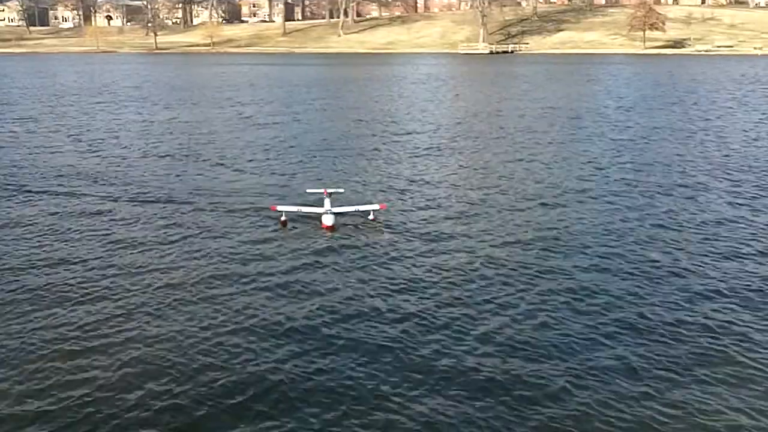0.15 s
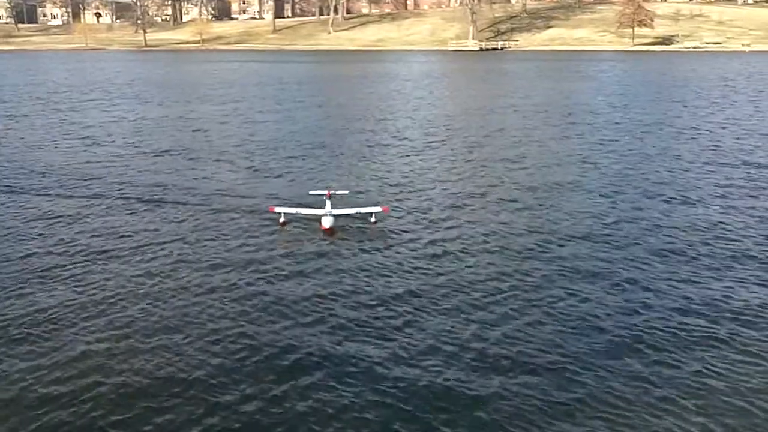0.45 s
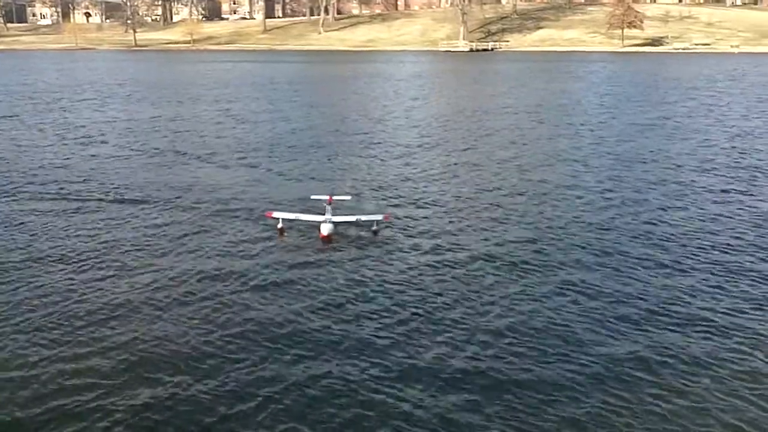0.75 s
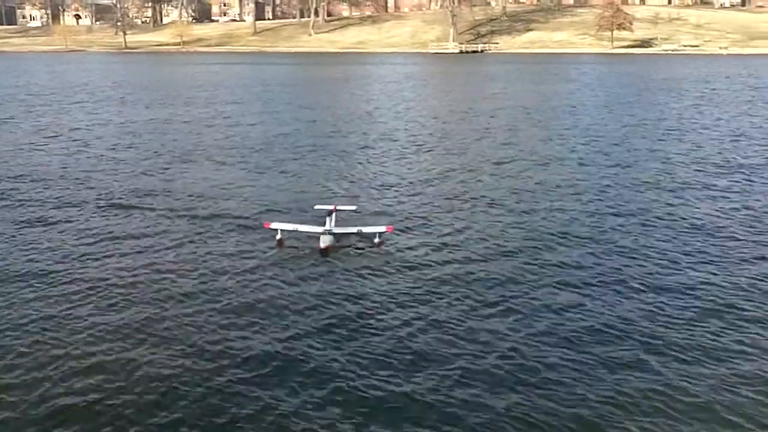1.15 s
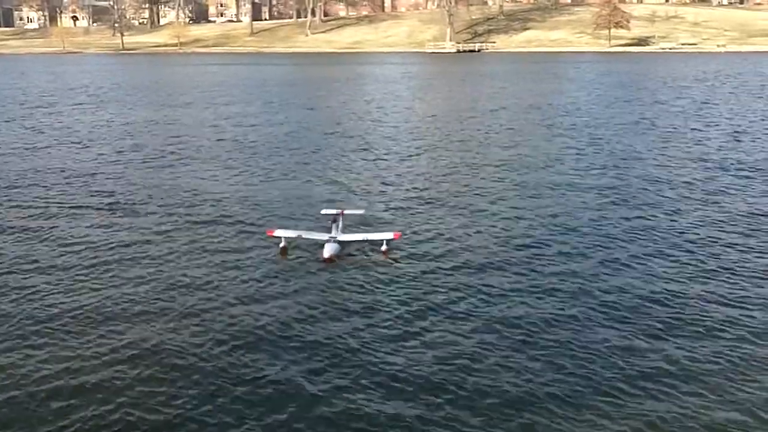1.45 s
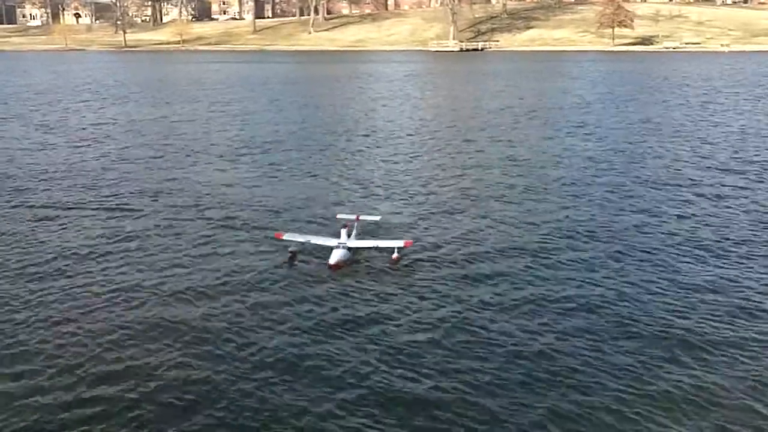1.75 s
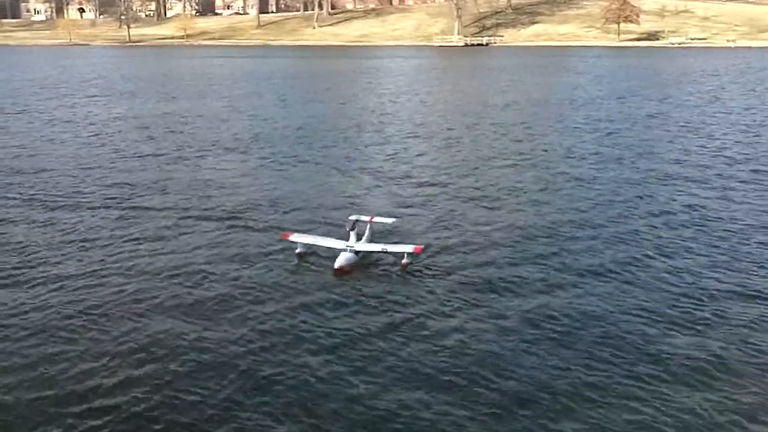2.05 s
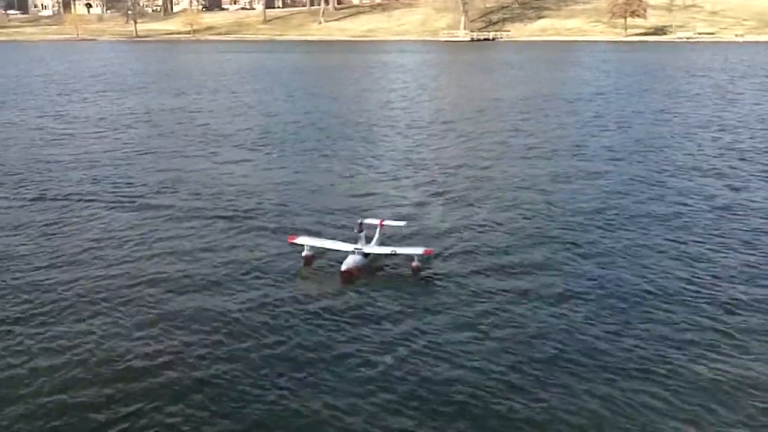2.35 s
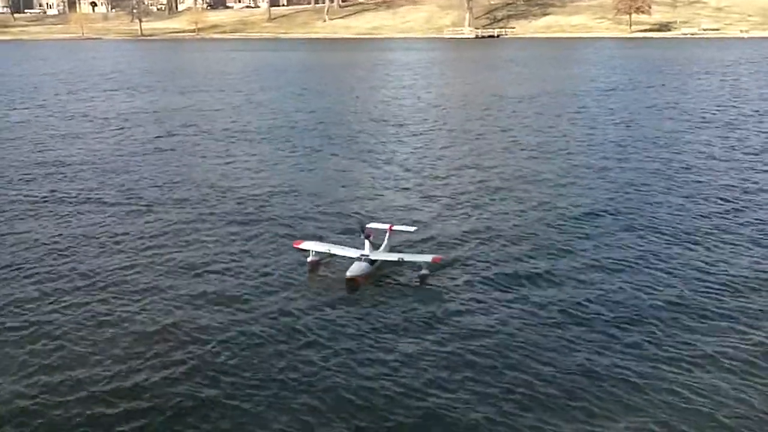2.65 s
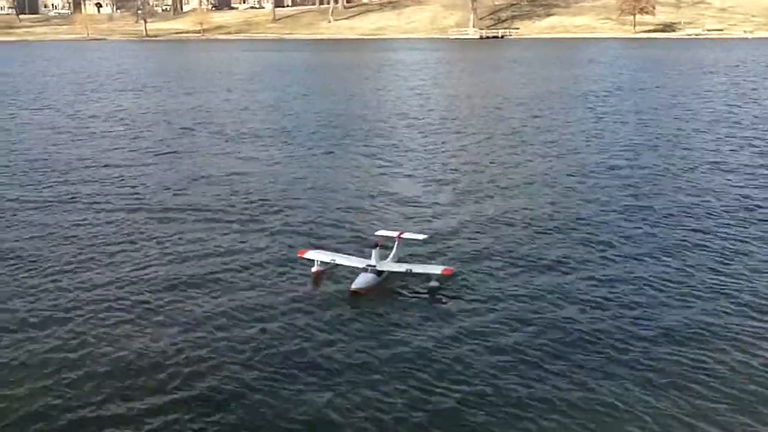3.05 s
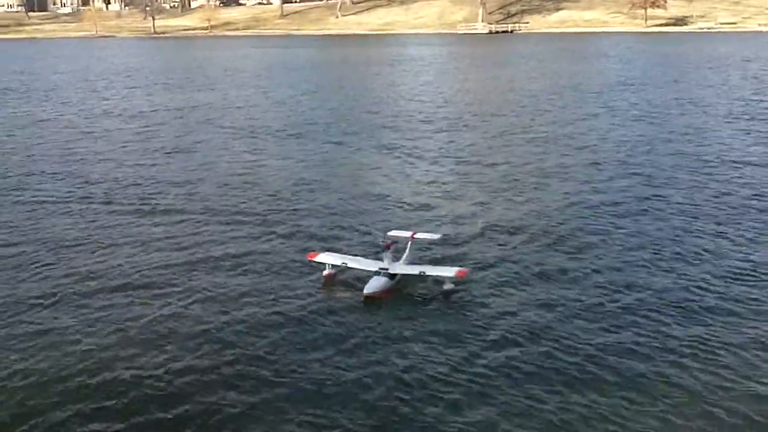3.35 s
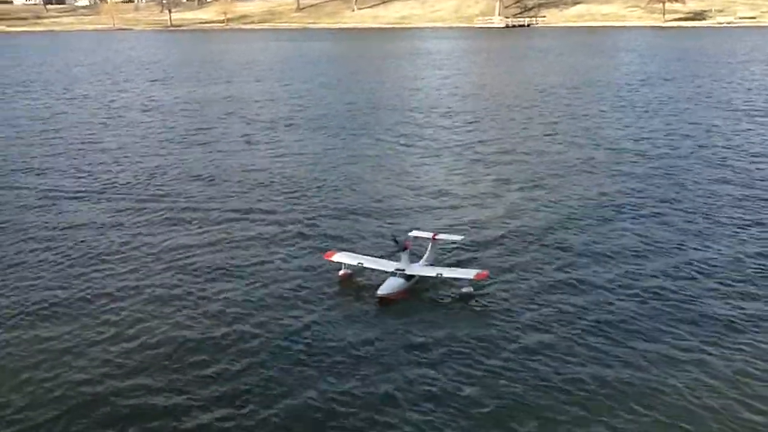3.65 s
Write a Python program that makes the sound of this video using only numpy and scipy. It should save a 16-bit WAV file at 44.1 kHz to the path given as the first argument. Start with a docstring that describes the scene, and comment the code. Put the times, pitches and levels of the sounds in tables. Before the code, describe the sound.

A small electric model seaplane taxis on a lake with a thin, high whine and propeller hiss, easing off twice. Wind rumbles and thumps on the microphone throughout, over a soft wash of water and faint drips.

```python
"""Electric seaplane taxiing on a lake

A small electric seaplane taxis and throttles back twice. Its speed controller whines at a near-fixed
pitch, with side tones spaced by the shaft speed; the motor casing rings and the propeller hisses.
Water drips and ticks over a far wash, and wind buffets the microphone. The sound is nearly mono."""
import sys
import numpy as np
from scipy import signal
from scipy.fft import rfft, irfft
from scipy.io import wavfile

SR = 44100
rng = np.random.default_rng(int(sys.argv[2]) if len(sys.argv) > 2 else 0)


def unload_audio(sound):
    """Save the sound as a 16-bit wav file, at the path given as the first command line argument."""
    columns = np.transpose(np.atleast_2d(sound))
    # keep every value between -1 and 1, then stretch to whole-number steps
    steps = np.round(np.clip(columns, -1, 1) * 32767)
    wavfile.write(sys.argv[1], SR, steps.astype(np.int16))


N = 168021
TIME = np.arange(N) / SR


def amp(db):
    return 10 ** (np.asarray(db) / 20)


def unit_rms(x):
    return x / np.sqrt(np.mean(x ** 2) + 1e-20)


def curves(rows):
    times, *columns = np.transpose(rows)
    return [np.interp(TIME, times, column) for column in columns]


def phase_of(hz):
    return 2 * np.pi * np.cumsum(hz) / SR


def band(x, low_hz, high_hz, order=2):
    return signal.sosfilt(signal.butter(order, [low_hz, high_hz], "band", fs=SR, output="sos"), x)


def coloured(spectrum):
    """Noise of a given spectrum, falling 40 dB in the octave beyond each end; rms 1."""
    hz, db = np.transpose(spectrum)
    hz, db = np.r_[hz[0] / 2, hz, hz[-1] * 2], np.r_[db[0] - 40, db, db[-1] - 40]
    grid = np.arange(1, N // 2 + 2) * SR / N
    gain = amp(np.interp(np.log(grid), np.log(hz), db))
    return unit_rms(irfft(rfft(rng.standard_normal(N)) * gain, N))


def drift(hz):
    """Slow random wander; rms 1."""
    r = np.exp(-2 * np.pi * hz / SR)
    return unit_rms(signal.lfilter([1], [1, -2 * r, r * r], rng.standard_normal(N + SR))[SR:])


def resonance(x, hz, width):
    r = np.exp(-np.pi * width / SR)
    gain = (1 - r * r) / 2
    return signal.lfilter([gain, 0, -gain], [1, -2 * r * np.cos(2 * np.pi * hz / SR), r * r], x)


# Noise floor of the microphone: (frequency [Hz], relative level [dB])
FLOOR_SPECTRUM = [(3000, -7), (6000, -4), (9000, -8.5), (15500, -1)]
def self_noise():
    """Each channel has a faint hiss of its own."""
    return amp(-74) * np.array([coloured(FLOOR_SPECTRUM), coloured(FLOOR_SPECTRUM)])


# Water far off on the lake: (frequency [Hz], relative level [dB])
WASH_SPECTRUM = [(300, 1), (600, -0.5), (1000, 0), (1600, -6), (2500, -7), (4000, -12.5)]
def lake_wash():
    """Distant water blends into a soft, wavering wash."""
    return amp(-48 + 0.7 * drift(14)) * coloured(WASH_SPECTRUM)


# Drips on the lake: (time [s], peak level [dB], starting pitch [Hz])
DRIPS = [(1.275, -45, 2250), (1.827, -40, 1760), (1.876, -41.5, 2230), (1.959, -43, 1720),
         (2.160, -38.5, 2290), (3.079, -42, 2240), (3.447, -40.5, 2370)]
def drips(attack_s=0.00036, t60_s=0.046):
    """Each drop rings briefly, rising in pitch."""
    out = np.zeros(N)
    t = TIME[:SR // 20]
    for start, db, hz in DRIPS:
        envelope = amp(db - 60 * t / t60_s) * np.minimum(t / attack_s, 1)
        i = int(start * SR)
        out[i:i + len(t)] += envelope * np.sin(2 * np.pi * hz * t * (1 + 1.8 * t))
    return out


# Ticks of spray: (time [s], body gain [dB], treble gain [dB])
SPRAY_TICKS = [(0.7692, -42, -47), (1.9914, -36, -52), (2.3935, -61, -54), (2.5481, -27, -51),
               (3.133, -34, -57), (3.4468, -33, -49)]
def spray(decay_s=0.0035):
    """Spray ticks in tiny bursts of noise, each in two bands."""
    out = np.zeros(N)
    t = TIME[:SR // 20]
    for start, body_db, treble_db in SPRAY_TICKS:
        noise = rng.standard_normal(len(t))
        body = amp(body_db) * band(noise, 2300, 5300, order=6)
        treble = amp(treble_db) * band(noise, 11500, 15000)
        i = int(start * SR)
        out[i:i + len(t)] += (body + treble) * np.exp(-t / decay_s)
    return out


# Wind at the microphone: (time [s], rumble level [dB], flutter level [dB])
WIND_LEVELS = [(0, -24, -50), (.1, -25.5, -39), (.5, -27, -52), (.75, -29.5, -39.5), (.95, -26.5, -42.5),
               (1.15, -25, -44.5), (1.27, -17, -36.5), (1.34, -19, -45), (1.45, -21, -36),
               (1.62, -20.5, -34), (1.7, -26, -42), (2.3, -31, -43.5), (2.42, -22, -62), (2.56, -31, -43.5),
               (2.67, -27.5, -50.5), (2.8, -31.5, -42), (3.1, -30, -44), (3.3, -29.5, -49.5),
               (3.81, -26, -39)]
# Its two layers: (frequency [Hz], relative level [dB])
RUMBLE_SPECTRUM = [(14, -2.5), (26, 4), (70, -3), (150, -13), (300, -29), (500, -46)]
FLUTTER_SPECTRUM = [(90, 4.5), (200, 4), (400, -10), (600, -54), (900, -38)]
def wind():
    """Air across the microphone makes a lumpy rumble with a patchier flutter above it."""
    rumble_db, flutter_db = curves(WIND_LEVELS)
    rumble = amp(rumble_db + 2 * drift(18)) * coloured(RUMBLE_SPECTRUM)
    flutter = amp(flutter_db + 7 * drift(17)) * coloured(FLUTTER_SPECTRUM)
    return rumble + flutter


# Puffs right on the microphone: (time [s], peak level [dB], upper band edge [Hz])
BUFFETS = [(0.082, -23.5, 524), (0.34, -26.5, 437), (.481, -26, 474), (0.5, -25.5, 507),
           (0.739, -25.5, 276), (1.392, -11.5, 622), (1.405, -33.5, 550), (1.441, -20, 734),
           (1.457, -28, 720), (1.473, -27.5, 550), (1.508, -27, 590), (1.585, -22, 480),
           (1.613, -27.5, 412), (2.127, -29.5, 415), (2.706, -21, 372), (3.354, -13.5, 375),
           (3.601, -27.5, 394)]
def buffets(attack_s=0.0053, tail_s=0.011, low_hz=97):
    """Each puff of wind lands as a short thump and trails off roughly."""
    out = np.zeros(N)
    t = TIME[:SR // 10]
    envelope = np.minimum(t / attack_s, 1) * (np.exp(-2 * t / attack_s) + amp(-6) * np.exp(-t / tail_s))
    for start, db, top_hz in BUFFETS:
        bassy_noise = signal.lfilter([1], [1, -0.94], rng.standard_normal(len(t)))
        puff = band(bassy_noise * envelope, low_hz, top_hz, order=4)
        i = int(start * SR)
        out[i:i + len(t)] += amp(db) * puff / np.abs(puff).max()
    return out


# Cruising shaft speed: (time [s], speed [turns/s])
CRUISE = [(0, 103.3), (.8, 103.9), (1.12, 104.75), (1.28, 104.2), (1.5, 104.4), (2.2, 103.8), (2.45, 104.7),
          (2.94, 104.0)]
# Throttling back: (time [s], speed lost [turns/s], lag [s])
THROTTLE_CUTS = [(1.505, 13.8, .16), (2.945, 12.0, .185)]
def shaft_speed():
    """Turns per second: the shaft settles to a lower speed after each throttle cut."""
    speed, = curves(CRUISE)
    for start, loss, lag in THROTTLE_CUTS:
        speed -= loss * (1 - np.exp(-np.maximum(TIME - start, 0) / lag))
    return speed


# Lowest tone of the motor: (time [s], level [dB])
HUM_LEVELS = [(1.8, -82), (2.2, -62), (3.0, -62.5), (3.81, -65)]
def motor_hum(speed):
    """A faint tone that falls with the shaft speed."""
    hz = 1634 + 14.7 * (speed - 90.7)
    db = curves(HUM_LEVELS)[0] + 2 * drift(2.5)
    return np.sqrt(2) * amp(db) * np.sin(phase_of(hz))


# Hiss of the blades: (frequency [Hz], relative level [dB])
BLADE_SPECTRUM = [(2200, -26), (2950, 6), (3400, -3), (4400, 2), (4950, 0.5), (5100, -13.5), (6200, -9),
                  (7000, -23), (8400, -14.5), (9200, -21), (11500, -23.5), (15500, -32)]
def propeller(shaft, db, throb_depth=0.32):
    """The blades hiss, throbbing once a turn."""
    throb = 1 + throb_depth * np.sin(shaft)
    return amp(db + 1.28 * drift(21)) * throb * coloured(BLADE_SPECTRUM)


# Magnet tones: (switching multiple [0 or 1], shaft multiple [cycles/turn], relative level [dB])
MAGNET_TONES = [(1, -42, -7), (1, -28, -18), (0, 42, 0), (0, 56, -14)]
def magnets(shaft, switching, level_db):
    """The magnets sing at multiples of the shaft speed, two of them counted down from the whine."""
    tones = sum(amp(db + drift(6)) * np.sin(on * switching + k * shaft) for on, k, db in MAGNET_TONES)
    return np.sqrt(2) * amp(level_db) * tones


# Casing resonances: (frequency [Hz], width [Hz], lift of passing tones [dB])
CASING_MODES = [(5878, 75, 22), (6008, 55, 6)]
# Noise ringing in each resonance: (relative level [dB])
CASING_RING_DB = [-2.5, 5]
def casing(tones, ring_db):
    """The casing lifts tones that cross its resonances, and rings there with narrow noise."""
    lifted, ring = np.zeros(N), np.zeros(N)
    for (hz, width, lift_db), noise_db in zip(CASING_MODES, CASING_RING_DB):
        lifted += amp(lift_db) * resonance(resonance(tones, hz, width), hz, width)
        narrow_noise = resonance(resonance(rng.standard_normal(N), hz, width), hz, 2 * width)
        ring += amp(noise_db) * unit_rms(narrow_noise)
    return tones + lifted + amp(ring_db) * unit_rms(ring)


# The drive, at the microphone: (time [s], propeller hiss [dB], magnet tones [dB], casing ring [dB])
DRIVE_LEVELS = [(0, -51.5, -60, -59), (.2, -48, -57, -52), (.7, -48, -57.5, -56), (1.13, -47.5, -55, -55.5),
                (1.48, -46, -58, -57), (1.58, -47, -60, -57.5), (2.3, -52.5, -61.5, -59.5),
                (2.8, -47.5, -59.5, -79), (3.12, -58.5, -59.5, -69), (3.3, -55.5, -63, -71),
                (3.75, -57.5, -59.5, -53.5)]
def drive(shaft, switching):
    """The motor in its casing and the propeller, turning on one shaft."""
    hiss_db, magnet_db, ring_db = curves(DRIVE_LEVELS)
    return casing(magnets(shaft, switching, magnet_db), ring_db) + propeller(shaft, hiss_db)


# Switching rate of the speed controller: (time [s], frequency [Hz])
SWITCHING_RATE = [(0, 8070), (1.8, 8069.5), (3.81, 8060)]
def switching_phase():
    """The controller switches at an almost steady rate, whatever the shaft speed."""
    return phase_of(curves(SWITCHING_RATE)[0])


# The whine, at the microphone: (time [s], centre tone level [dB], side tone level [dB])
WHINE_LEVELS = [(0, -54.5, -72), (.3, -61, -74), (.5, -58, -76), (.8, -58.5, -71), (1.0, -48.5, -72),
                (1.25, -53, -73), (1.5, -51, -69.5), (1.9, -48.5, -70), (2.4, -51.5, -66),
                (2.85, -53.5, -67), (3.1, -62, -70), (3.4, -72, -70), (3.81, -67, -69.5)]
# Side tones: (offset from the whine [cycles/turn], relative level [dB])
SIDE_TONES = [(-21, 0), (-14, -8), (-8, -15), (-7, -3), (-1, -7), (1, -1), (2, 2), (3, -7), (4, 0), (5, 1),
              (6, -2), (7, -3), (14, -14), (21, -14), (28, -12)]
def controller_whine(shaft, switching, sweep_rad=0.2):
    """Switching makes a high whine; its side tones bunch into one sweep a turn."""
    centre_db, side_db = curves(WHINE_LEVELS)
    sides = sum(amp(db + 2 * drift(4.4)) * np.sin(switching + k * shaft + sweep_rad * k * k)
                for k, db in SIDE_TONES)
    centre = amp(centre_db + drift(13.5)) * np.sin(switching)
    return np.sqrt(2) * (centre + amp(side_db) * sides)


def narrow_stereo(mono, left_lag_s=2.1e-5, centred_below_hz=800):
    """Nearly mono sound: the left channel lags slightly in the treble, and the lows stay centred."""
    padded = N + SR
    spectrum = rfft(mono, padded)
    hz = np.arange(len(spectrum)) * SR / padded
    lag_s = left_lag_s * hz ** 2 / (hz ** 2 + centred_below_hz ** 2)
    return irfft(spectrum * np.exp(1j * np.outer([-1, 1], np.pi * hz * lag_s)), padded)[:, :N]


def scene():
    """Seaplane, lake and wind, heard from one spot."""
    speed = shaft_speed()
    shaft = phase_of(speed + 0.1046 * drift(9.6))
    switching = switching_phase()
    seaplane = controller_whine(shaft, switching) + motor_hum(speed) + drive(shaft, switching)
    background = lake_wash() + drips() + spray() + wind() + buffets()
    return narrow_stereo(seaplane + background) + self_noise()


# Dead spots in the treble: (frequency [Hz], width [Hz])
DEAD_SPOTS = [(2710, 1330), (5505, 340), (7850, 270), (10880, 620), (11050, 1440)]
def record(dry, cutoff_hz=15600):
    """Dead spots notch the treble, then the top is cut."""
    out = dry
    for hz, width in DEAD_SPOTS:
        out = signal.lfilter(*signal.iirnotch(hz, hz / width, fs=SR), out)
    return signal.sosfilt(signal.cheby2(16, 50, cutoff_hz, fs=SR, output="sos"), out)


dry = scene()
out = record(dry)
unload_audio(out)
```